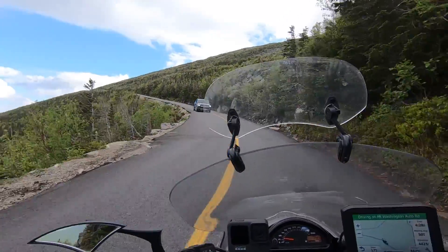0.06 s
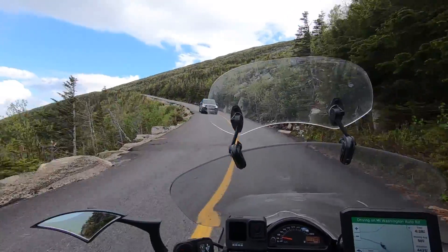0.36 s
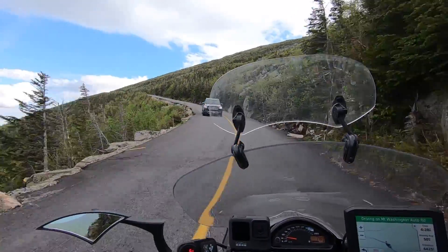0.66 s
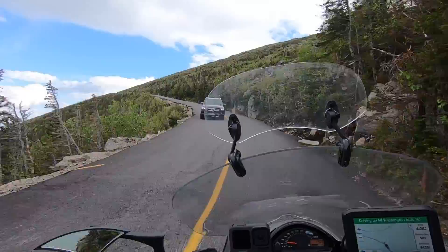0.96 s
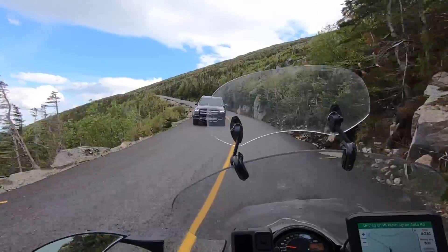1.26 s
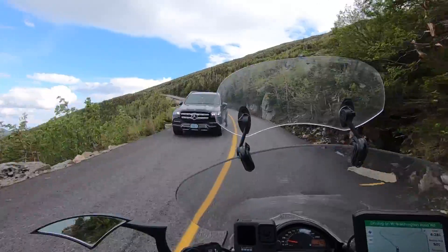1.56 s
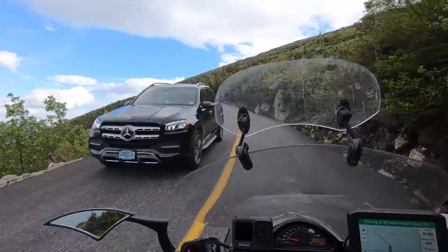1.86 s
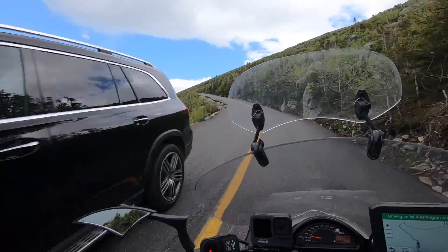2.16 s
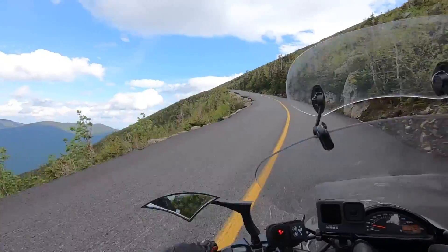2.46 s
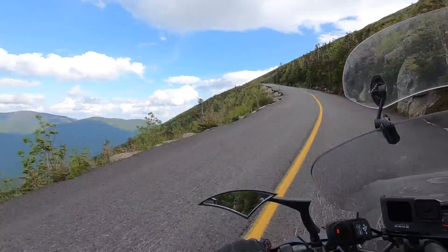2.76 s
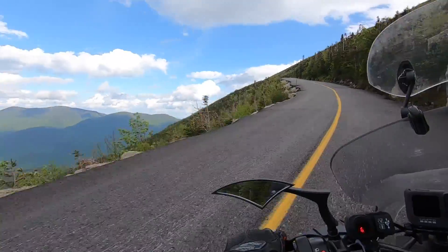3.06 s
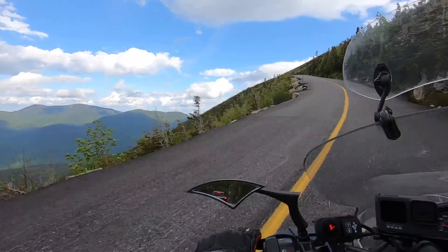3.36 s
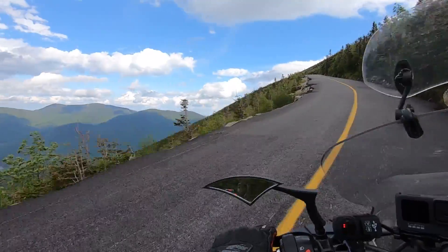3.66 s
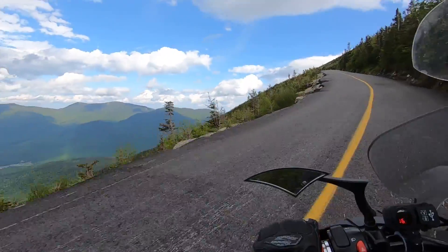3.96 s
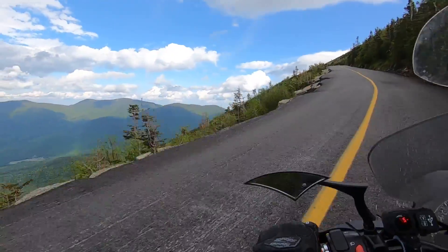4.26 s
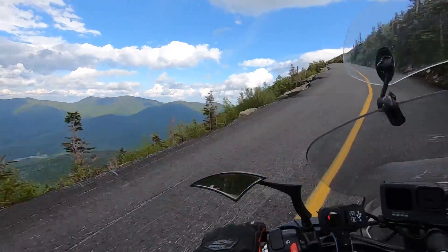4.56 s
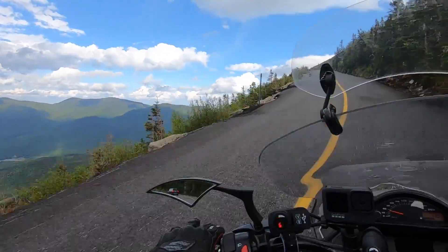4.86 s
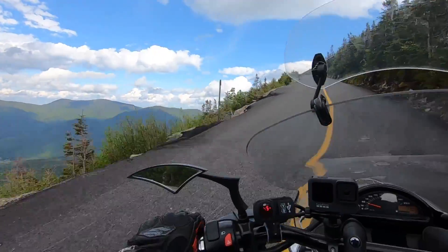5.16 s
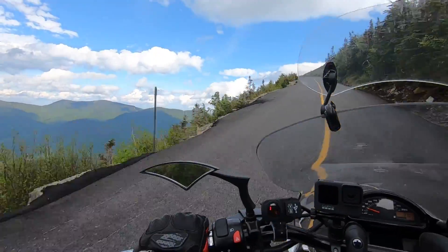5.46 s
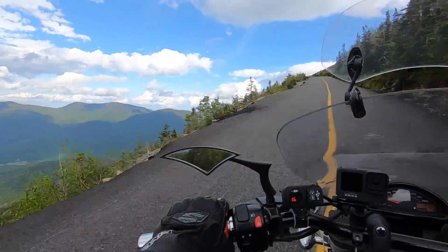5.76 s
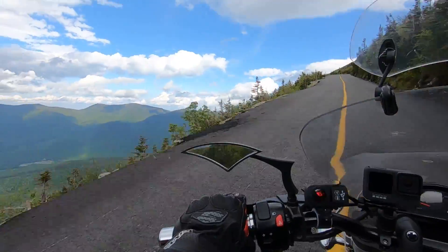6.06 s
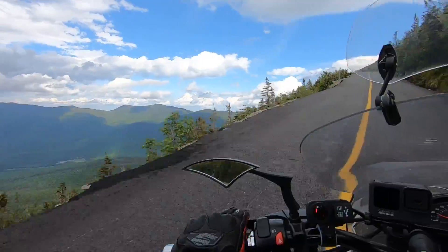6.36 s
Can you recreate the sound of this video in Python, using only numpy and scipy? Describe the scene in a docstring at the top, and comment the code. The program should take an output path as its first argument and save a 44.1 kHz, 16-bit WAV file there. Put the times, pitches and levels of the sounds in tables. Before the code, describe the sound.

A twin-cylinder motorcycle pulls up a mountain road, heard from the rider's helmet. Its uneven, throbbing exhaust rises slowly in pitch over valve clatter and gear whine. The tyres of an oncoming car swell and fade close by, and gusts thump the microphone. Near the end the throttle shuts, the gearbox clunks up a gear, and the engine burbles on at low revs.

```python
"""A mountain road, from the helmet of a rider climbing it on a V-twin motorcycle.
Uneven firings throb through the pipes, over valve clatter and gear whine. The engine pulls slowly up
through the revs, the throttle shuts, the gearbox clunks up a gear, and it lugs on, burbling, at low revs.
The tyres of an oncoming car roar past close by, and gusts of wind buffet the microphone."""
import sys
import numpy as np
from scipy import signal
from scipy.fft import rfft, irfft, next_fast_len
from scipy.io import wavfile
from scipy.ndimage import uniform_filter1d

SR = 44100
rng = np.random.default_rng(int(sys.argv[2]) if len(sys.argv) > 2 else 0)


def dump_mix(stems):
    """Bounce the given channels to the path in sys.argv[1] as a 16-bit WAV at rate SR."""
    frames = np.atleast_2d(stems).T  # one column per channel
    limited = np.clip(frames, -1, 1)  # hard clip at full scale
    pcm = np.round(limited * 32767).astype(np.int16)
    wavfile.write(sys.argv[1], SR, pcm)


N = 282357
TIME = np.arange(N) / SR
CRUISE_HZ = 33  # reference cycle rate for the engine's levels
CYLINDER_LAG = .628  # cycles: the twin fires about five eighths, then three eighths apart
SHUT_S, OPEN_S = 5.255, 5.76  # the throttle shuts for the shift, then reopens in the higher gear

# The rev curve: (time [s], four-stroke cycle rate [Hz])
REVS = [(0, 28.61), (.18, 28.48), (1.12, 29.11), (1.57, 30.24), (2.1, 31.15), (2.42, 32.49), (3.04, 34.33),
        (3.8, 35.66), (4.2, 36.22), (4.42, 36.8), (5.25, 37.86), (5.64, 27.81), (5.73, 27.59),
        (5.81, 23.57), (6.4, 23.87)]
def engine_rotation(wobble_cycles=.001):
    """The crank turns a little unsteadily; gives the cycle rate and the running count of cycles."""
    hz, = curves(REVS)
    return hz, np.cumsum(hz) / SR + wobble_cycles * drift(11.6)


# Resonances of pipes and airbox: (frequency [Hz], width [Hz], level [dB])
PIPE_MODES = [(73.4, 12, -12.5), (137.2, 33, -6), (173, 17.3, -9.5), (271.6, 28.3, -7.5), (389, 28, -6.5),
              (535.4, 12, -7), (570.7, 19, -4.5), (634.3, 20.5, -2), (843, 40, -20), (1118, 51, -23.5)]
# The engine's accent on each harmonic: (order [x cycle rate], level [dB])
ORDER_ACCENTS = [(1, 5), (2, -5.5), (3, 0), (4, 9.5), (5, 4), (6, 4), (7, 11), (8, 0), (9, -2.5), (10, 4.5),
                 (11, 3.5), (12, -10.5), (13, 7.5), (14, 4), (15, 11), (16, 3), (17, -6.5), (18, 2),
                 (19, -2.5), (20, 7), (21, -5), (22, -0.5), (23, 8), (24, -0.5), (25, 2), (26, 4.5),
                 (27, -6.5), (28, 11), (29, 3), (30, -0.5)]
# Where each exhaust register starts, and where the last ends: (order [x cycle rate])
REGISTER_EDGES = [1, 3, 4, 10, 22, 37]
# Unevenness of the firings, low register to high: name -> (rms flutter [share of amplitude])
REGISTER_ROUGHNESS = {"thump": 0.07, "lope": .05, "boom": 0.039, "bark": 0.12, "snarl": 0.2}
# The boom darkens with revs, off the throttle and when lugging. Its tilt per octave of pitch:
# (cruise [dB], revs [dB/octave], effort [dB/dB], shut [dB], lugging [dB])
BOOM_TILT = (1.8, -15.5, -0.5, -14, -23.5)
def exhaust(hz, cycles, rear_gain=0.8, ring_share=.38, scatter_rad=1.5):
    """Paired suck-and-blow pulses, as orders of the cycle rate, sweep through the pipe resonances."""
    accents = amp(np.interp(np.arange(REGISTER_EDGES[-1]), *np.transpose(ORDER_ACCENTS)))
    # the passing car's flank throws back the upper registers while it is level with the pipes
    flank_db = 3.5 * swell(2.58, width_s=0.24)
    out = np.zeros(N)
    for first, end, (name, rough) in zip(REGISTER_EDGES, REGISTER_EDGES[1:], REGISTER_ROUGHNESS.items()):
        tilt_db = follow_engine(hz, *BOOM_TILT) if name == "boom" else 0
        wave, power = np.zeros(N), np.zeros(N)
        for order in range(first, end):
            pair = 1 + rear_gain * np.exp(-2j * np.pi * order * CYLINDER_LAG)
            pipe_gain = resonant_gain(PIPE_MODES, order * hz)
            gain = accents[order] * abs(pair) * pipe_gain * amp(tilt_db * np.log2(order))
            # high orders ring on in the pipes and bounce off road and fairing, losing step
            scatter = scatter_rad * np.clip((order - 5) / 3, 0, 1) * rng.standard_normal()
            phase_lag = ring_share * pipe_phase(order * hz) + scatter
            wave -= gain * np.cos(2 * np.pi * order * cycles + np.angle(pair) - phase_lag)
            power += gain ** 2 / 2
        level_db = follow_engine(hz, *ENGINE_MIX[name]) + (flank_db if name in ("bark", "snarl") else 0)
        burn = 1 + rough * drift(8.7)  # no two firings burn alike
        out += amp(level_db) * wave / np.sqrt(power) * burn
    return out


def pipe_phase(hz):
    """Each pipe resonance holds back the sound above it a little more."""
    f = np.arange(1., 2000)
    return np.interp(hz, f, sum(np.arctan2(width, centre - f) for centre, width, _ in PIPE_MODES))


def firings(cycles, decay_cycles):
    """Two unevenly spaced bursts in every cycle, one for each cylinder."""
    return np.exp(-(cycles % 1) / decay_cycles) + np.exp(-((cycles - CYLINDER_LAG) % 1) / decay_cycles)


def throttle():
    """How far the throttle is shut, and how far the engine is lugging, each 0-1."""
    lugging = ramp(OPEN_S, takes_s=.11)
    return ramp(SHUT_S, takes_s=.11) - lugging, lugging


# How hard the engine pulls: (time [s], effort [dB])
EFFORT = [(0, 0.5), (.75, 0.5), (1.05, -0.5), (1.42, 0.1), (1.6, -0.5), (2.05, 0.33), (2.42, 1.0),
          (2.85, .2), (3.25, 0.8), (3.6, -0.5), (4.25, -0.35), (4.5, 0.6), (4.85, -0.26), (5.2, -0.3),
          (6.0, -1.5), (6.4, 0)]
# Each engine layer's fader and how it rides:
# name -> (cruise level [dB], revs [dB/octave], effort [dB/dB], shut [dB], lugging [dB])
ENGINE_MIX = { "thump": (-17, 2.5, 2.5, -8, -1), "lope": (-25.5, -14, 1.3, 2.5, -24),
              "boom": (-22.5, -23.5, 1.74, -10, -5), "bark": (-24.5, -6, 0.08, -13, -9),
              "snarl": (-36, -16.5, 1.3, -8, -7.5), "rasp": (-28, -4.5, 2.7, -4, -0.5),
              "clatter": (-39, -1.5, 2, -5.5, -3), "drive": (-34, 19.5, 0, -11, -0.5),
              "hiss": (-58.5, -1, 2.3, -1.5, -4), }
def follow_engine(hz, cruise_db, octave_db, effort_share, shut_db, lugging_db):
    """A dB curve that rides the engine's revs, effort and throttle."""
    shut, lugging = throttle()
    effort_db, = curves(EFFORT)
    pull_db = cruise_db + octave_db * np.log2(hz / CRUISE_HZ) + effort_share * effort_db
    return pull_db + shut_db * shut + lugging_db * lugging


# EQ of the gas leaving the pipes: (frequency [Hz], level [dB])
RASP_EQ = [(60, -37.5), (110, -8.5), (160, -2.5), (230, -3), (330, -2.5), (440, -4.5), (550, 2.5),
           (640, 1.5), (730, -4.5), (850, -7.5), (950, -12.5), (1350, -13.5), (1650, -25.5), (8000, -100)]
def rasp(hz, cycles, steady=1.0):
    """Turbulent gas streams from the pipes, with a puff after each firing."""
    puffs = (steady + firings(cycles, decay_cycles=0.33)) * rng.standard_normal(N)
    return amp(follow_engine(hz, *ENGINE_MIX["rasp"])) * coloured(puffs, RASP_EQ)


def burble(cycles, shut_db=-25.5, lugging_db=-31):
    """With the throttle shut or the engine lugging, weak ragged firings pop in the pipes."""
    shut, lugging = throttle()
    pops = firings(cycles, decay_cycles=0.33) * rng.standard_normal(N)
    pop_eq = [(30, -34), (70, -8), (125, 0.5), (180, -4), (280, -7), (400, -20), (6000, -110)]
    return (amp(shut_db) * shut + amp(lugging_db) * lugging) * coloured(pops, pop_eq)


# Metallic ring of the engine cases: (frequency [Hz], width [Hz], level [dB])
CASE_MODES = [(835, 21, 6.5), (1107, 90, 4.5), (1299, 35, 5), (1790, 84, -11.5), (2163, 67, -6),
              (2388, 52, -1.5), (2653, 53, -7), (3005, 90, -8.5), (4750, 90, -22.5), (5560, 110, -27.5),
              (6600, 91, -30)]
# EQ of the valve gear: (frequency [Hz], level [dB])
CLATTER_EQ = [(700, -20.5), (1300, 6.5), (1650, -1.5), (2000, 4), (2400, 4.5), (3000, -1), (3500, -12.5),
              (5000, -34), (12000, -58)]
def valve_clatter(cycles, steady=1.7, decay_cycles=0.065, trim_db=-3):
    """Valve gear ticks four times a cycle over a steady rattle, and rings the cases."""
    envelope = steady + firings(cycles, decay_cycles) + firings(cycles + 0.41, decay_cycles)
    ticks = envelope * rng.standard_normal((2, N))
    rattle = coloured(ticks[0], CLATTER_EQ)
    ring = shaped(ticks[1], lambda f: ringing(CASE_MODES, f) / (1 + (f / 9500) ** 6))
    return amp(trim_db) * (rattle + ring)


# Tones of meshing gears and cam chain: (order [x cycle rate], relative level [dB])
GEAR_TONES = [(29, -6), (37, -7), (45, -6), (61.6, 0.5), (68, -4), (77, -4.5), (88, -0.5), (91, -3.5),
              (169, 0), (184.8, -2)]
def gear_whine(hz, cycles, waver_db=2):
    """Each gear tone sings out as it crosses a resonance of the cases."""
    whine = np.zeros(N)
    for order, db in GEAR_TONES:
        tone = np.sin(2 * np.pi * order * cycles + 0.21 * drift(23))
        whine += amp(db + waver_db * drift(4.7)) * resonant_gain(CASE_MODES, order * hz) * tone
    return whine


def valve_buzz(cycles, trim_db=-7.0, orders=200):
    """The valve train strikes the same way in every cycle: a fine metallic buzz."""
    strikes = irfft(np.exp(2j * np.pi * rng.random(orders)), n=4096)
    buzz = np.interp(cycles % 1, np.linspace(0, 1, len(strikes)), strikes)
    return amp(trim_db) * coloured(buzz, CLATTER_EQ)


def transmission(hz, order=14.5, coast_hz_per_s=55, waver_db=2):
    """The drive hums at road speed: it rises with the engine, then sags once the throttle shuts."""
    driven_hz = order * np.interp(np.minimum(TIME, SHUT_S), TIME, hz)
    hum_hz = driven_hz - coast_hz_per_s * np.maximum(TIME - SHUT_S, 0)
    tone = np.sin(2 * np.pi * np.cumsum(hum_hz) / SR + 0.37 * drift(9.8))
    return amp(follow_engine(hum_hz / order, *ENGINE_MIX["drive"]) + waver_db * drift(3.3)) * tone


# Hits of the upshift: (time [s], level [dB], decay [s], low-pass cutoff [Hz])
SHIFT_HITS = [(5.488, -24.5, .005, 6000), (5.497, -23, .011, 3800), (5.549, -20.5, .012, 1100)]
# Body of the gearbox: (frequency [Hz], width [Hz], level [dB])
GEARBOX_MODES = [(310, 33, 0), (668, 27, 33), (1110, 170, 16), (2400, 570, -6), (5040, 4000, -27)]
def gear_change():
    """Lever and gear dogs knock home, ringing the gearbox."""
    out = np.zeros(N)
    for s, db, decay_s, top_hz in SHIFT_HITS:
        knock = amp(db) * (TIME >= s) * np.exp(-abs(TIME - s) / decay_s) * rng.standard_normal(N)
        clunk = shaped(knock, lambda f: ringing(GEARBOX_MODES, f) / (1 + (f / top_hz) ** 4))
        out += np.std(knock) * clunk
    return out


# EQ of tyres on the road: (frequency [Hz], level [dB])
TYRE_EQ = [(100, -19), (350, 6), (600, 1), (950, -2), (1500, -7), (2500, -18), (4500, -32.5), (10000, -43),
           (16000, -71)]
def passing_car(nearest_s=2.23, coming_s=0.67, leaving_s=0.28, peak_db=-30):
    """Tyre roar swells and fades with the distance of the oncoming car."""
    distance = (TIME - nearest_s) / np.where(TIME < nearest_s, coming_s, leaving_s)
    return amp(peak_db) / (1 + distance ** 2) * coloured(rng.standard_normal(N), TYRE_EQ)


# Gusts on top of the breeze: (time [s], peak level [dB])
GUSTS = [(1.1, -23), (1.48, -15.5), (2.7, -16), (3.38, -13.5), (4.15, -13.5), (4.66, -15.5), (5.08, -12),
         (5.3, -14.5), (6.05, -17)]
# EQ of the buffeting: (frequency [Hz], level [dB])
BUFFET_EQ = [(3, -4), (10, 14), (20, 7), (32, -7.5), (45, -2.5), (70, -12), (110, -16.5), (250, -37),
             (1000, -77)]
def wind(sheltered_db=-24.5, exposed_db=-17.5):
    """Eddies thump the microphone, harder once out of the shelter of the trees and in each gust."""
    breeze = amp(sheltered_db + (exposed_db - sheltered_db) * ramp(1, takes_s=0.39))
    gust_power = sum(amp(db) ** 2 * swell(s, width_s=0.08) for s, db in GUSTS)
    eddies = coloured(rng.standard_normal(N), BUFFET_EQ)
    eddies /= np.sqrt(uniform_filter1d(eddies ** 2, size=11000))  # levelled over a quarter second
    return np.sqrt(breeze ** 2 + gust_power) * eddies


# EQ of the rushing air: (frequency [Hz], level [dB])
AIR_EQ = [(1500, -17.5), (3500, 12), (4600, 14.5), (6700, -0.5), (8000, -9), (11000, 1), (13000, -13.5),
          (15700, -29)]
def air_hiss(hz, flutter_db=2.1):
    """A thin hiss of air flutters on top, its level riding with the engine."""
    hiss = coloured(rng.standard_normal(N), AIR_EQ)
    return amp(follow_engine(hz, *ENGINE_MIX["hiss"]) + flutter_db * drift(40)) * hiss


def amp(db):
    """Decibels to gain."""
    return 10 ** (np.asarray(db) / 20)


def unit_rms(x):
    """Scales to rms 1."""
    return x / np.sqrt(np.mean(x ** 2) + 1e-20)


def curves(rows):
    """The columns of a time table at every sample."""
    s, *columns = np.transpose(rows)
    return [np.interp(TIME, s, column) for column in columns]


def ramp(s, takes_s):
    """A fade from 0 to 1, centred on the given moment."""
    return np.clip((TIME - s) / takes_s + .5, 0, 1)


def swell(s, width_s):
    """A bell-shaped envelope peaking at the given moment."""
    return np.exp(-((TIME - s) / width_s) ** 2)


def drift(hz):
    """A slow random wander of rms 1, up to the given rate."""
    f = np.fft.rfftfreq(N, 1 / SR)
    return unit_rms(irfft(rfft(rng.standard_normal(N)) / (1 + (f / hz) ** 4), N))


def shaped(x, response):
    """Filters x by a function of frequency; rms 1."""
    size = next_fast_len(N + 8192)
    f = np.fft.rfftfreq(size, 1 / SR)
    return unit_rms(irfft(rfft(x, size) * response(f), size)[:N])


def coloured(x, eq):
    """Runs x through an EQ curve; rms 1."""
    hz, db = np.transpose(eq)
    return shaped(x, lambda f: amp(np.interp(np.log(f + 1), np.log(hz + 1), db)))


def ringing(modes, f):
    """Complex response of a set of resonances."""
    return sum(amp(db) * f * width / (f * width + 1j * (f * f - hz * hz)) for hz, width, db in modes)


def resonant_gain(modes, hz):
    """Gain of a set of resonances along a frequency curve."""
    f = np.arange(1., SR / 4)
    power = sum(abs(ringing([mode], f)) ** 2 for mode in modes)
    return np.interp(hz, f, np.sqrt(power))


def scene():
    """The mono mix: pipes and machinery, then the car and the wind."""
    hz, cycles = engine_rotation()
    pipes = exhaust(hz, cycles) + rasp(hz, cycles) + burble(cycles)
    metal = valve_clatter(cycles) + gear_whine(hz, cycles) + valve_buzz(cycles)
    machinery = amp(follow_engine(hz, *ENGINE_MIX["clatter"])) * metal + transmission(hz) + gear_change()
    return (pipes + machinery + passing_car() + wind() + air_hiss(hz))[None]


def record(dry):
    """A steep low-pass trims the very top of the mix."""
    lowpass = signal.firwin(511, 15750, window=("kaiser", 9), fs=SR)
    return signal.oaconvolve(dry, lowpass[None], "same")


dry = scene()
out = record(dry)
dump_mix(out)
```